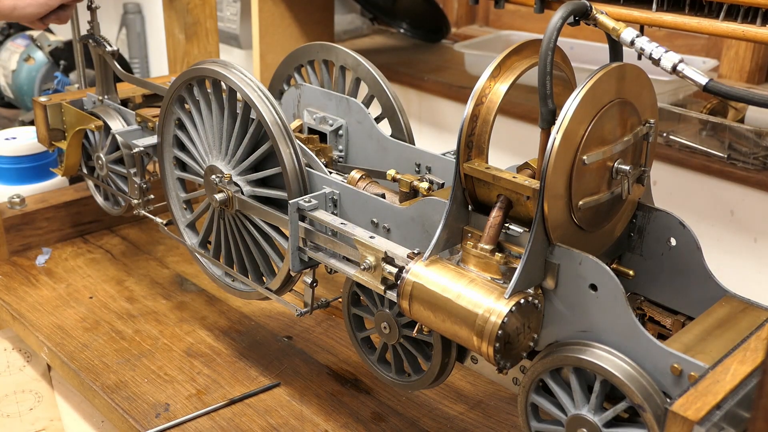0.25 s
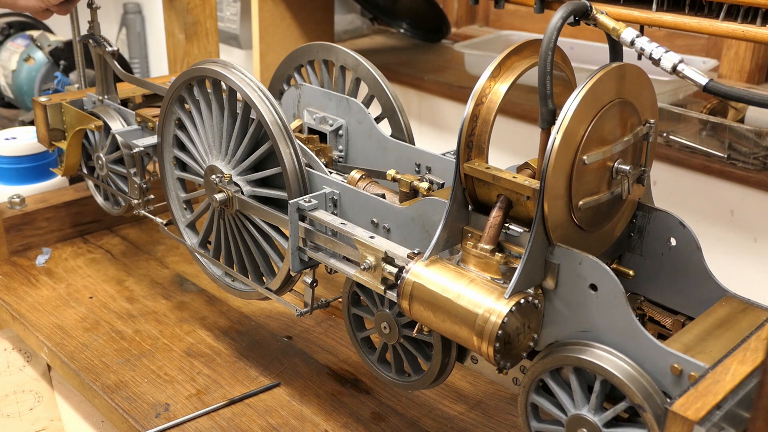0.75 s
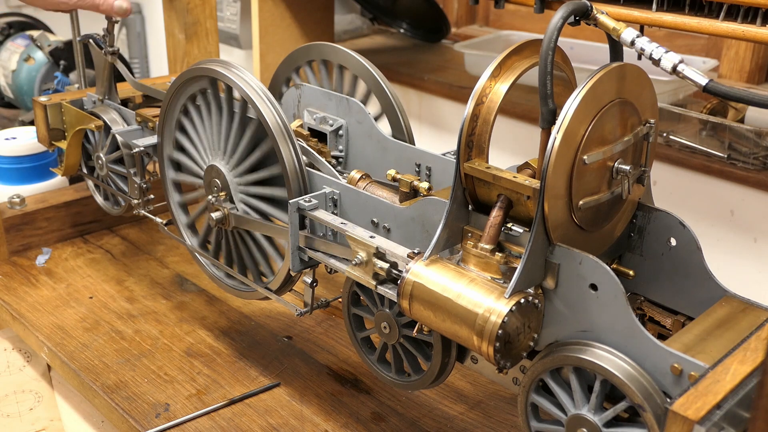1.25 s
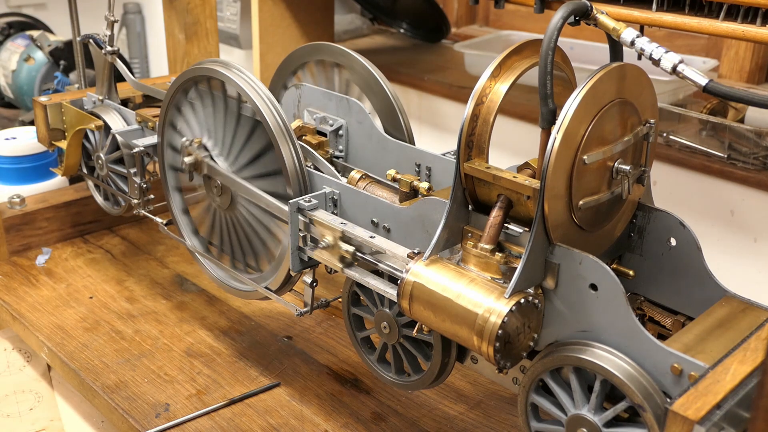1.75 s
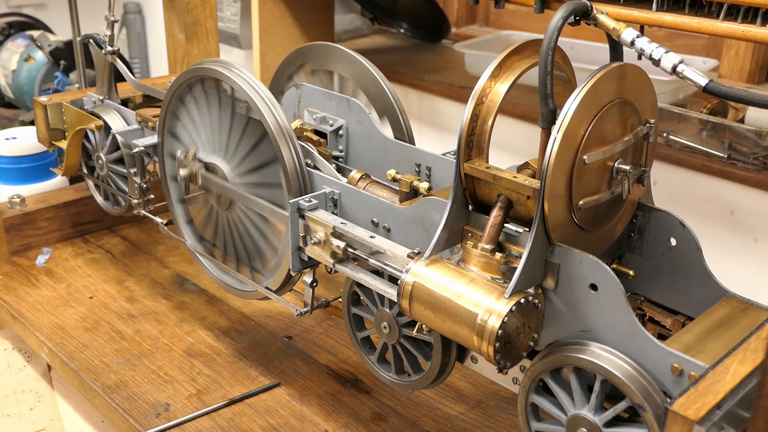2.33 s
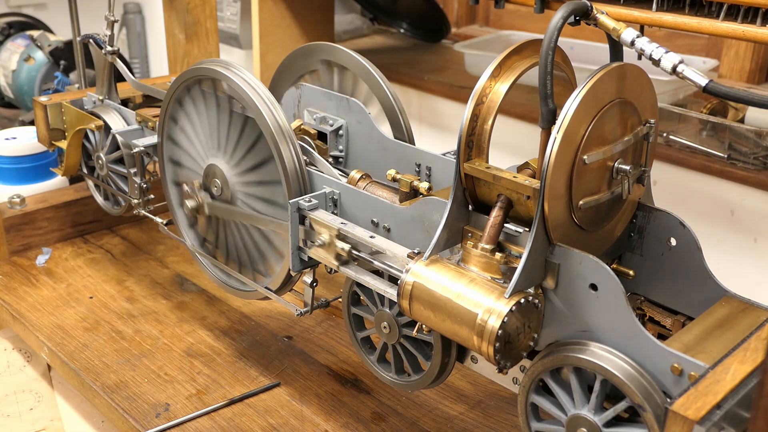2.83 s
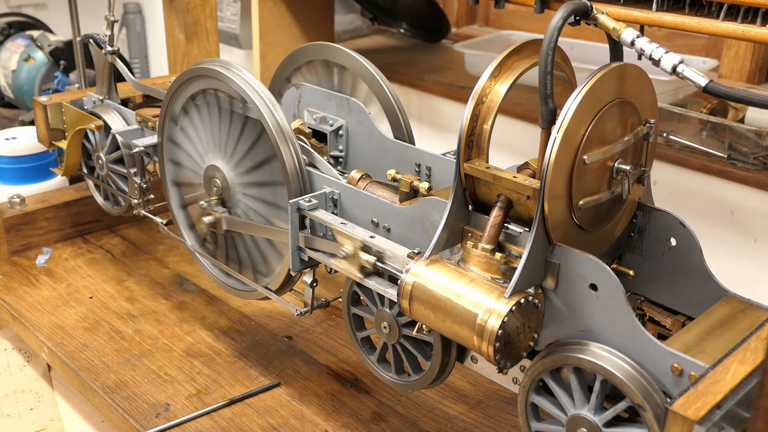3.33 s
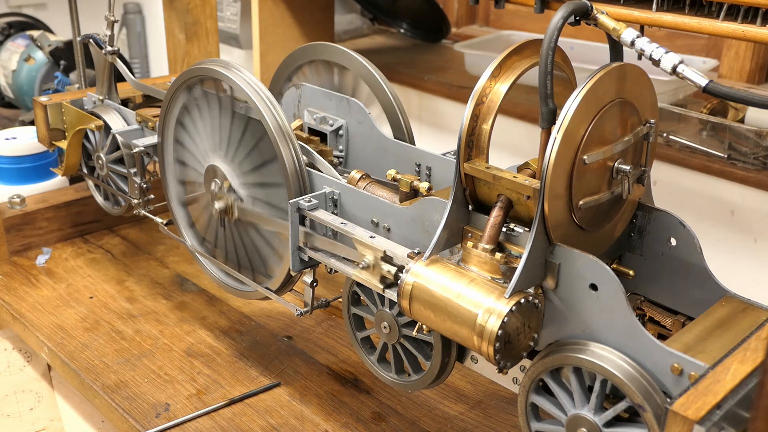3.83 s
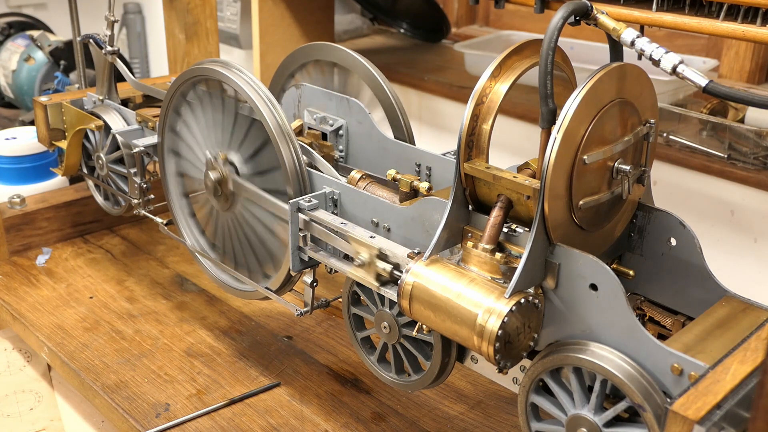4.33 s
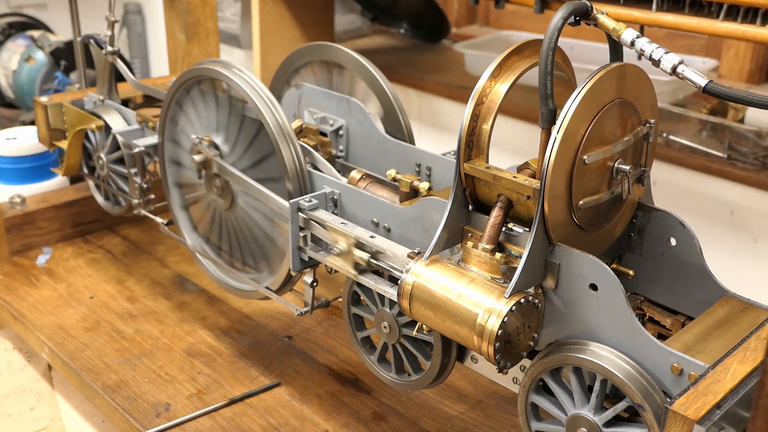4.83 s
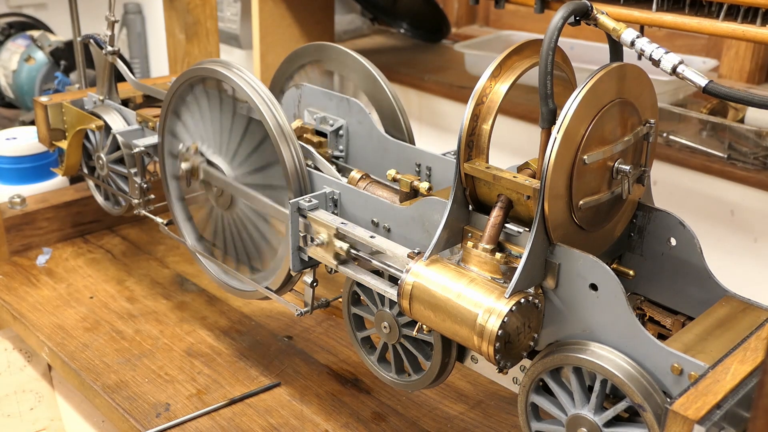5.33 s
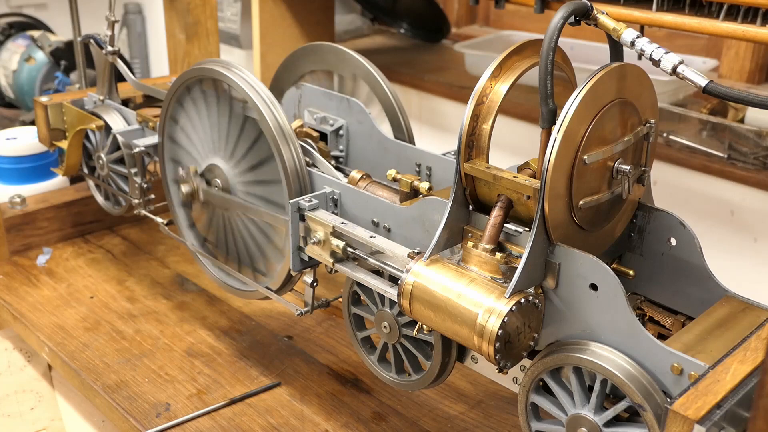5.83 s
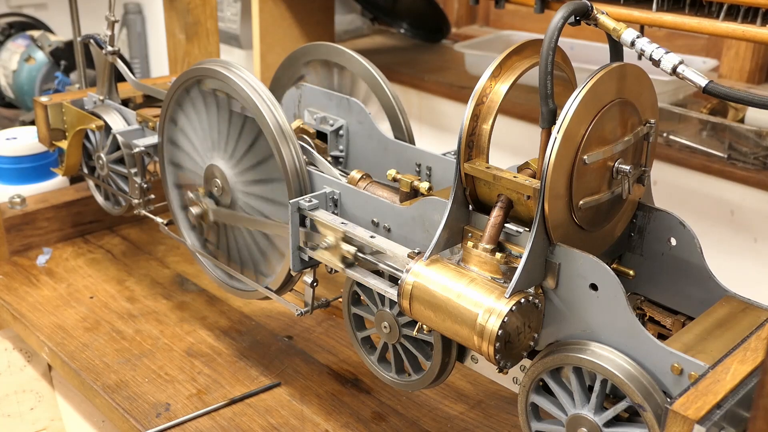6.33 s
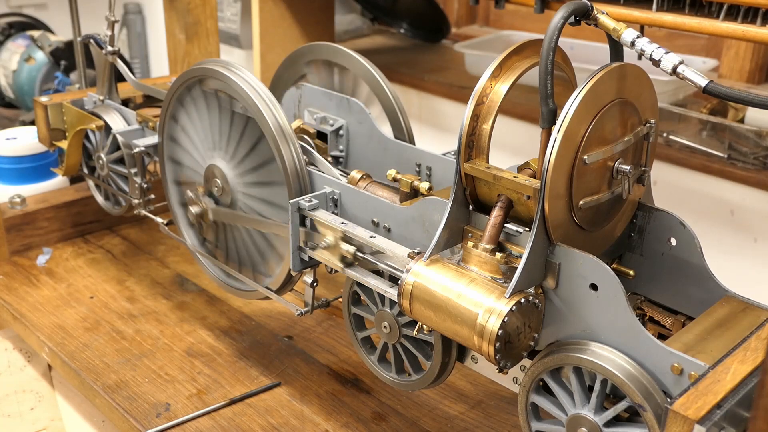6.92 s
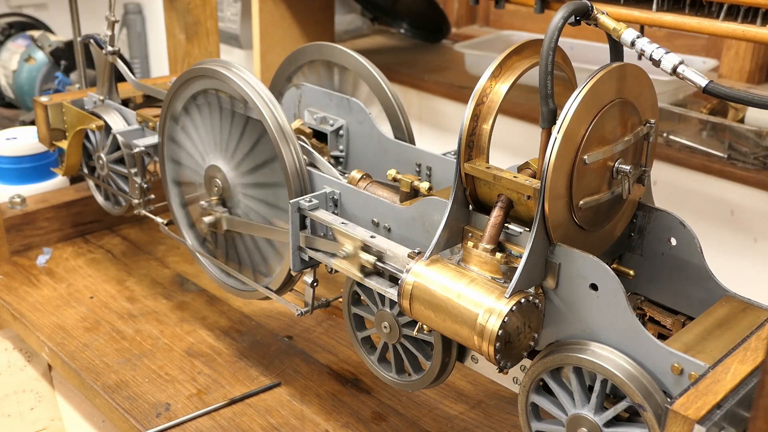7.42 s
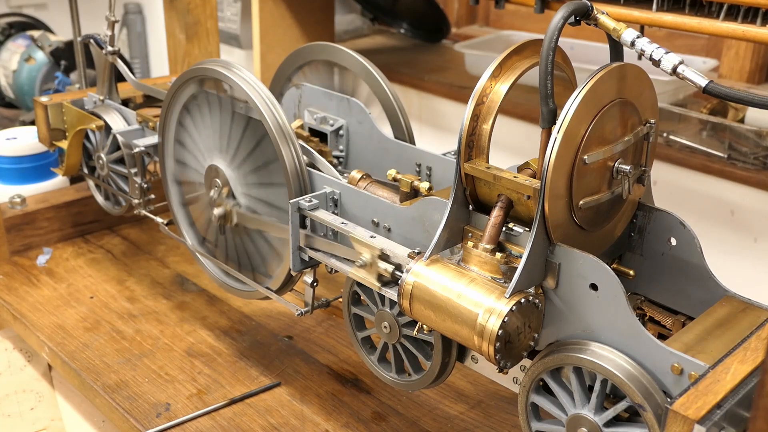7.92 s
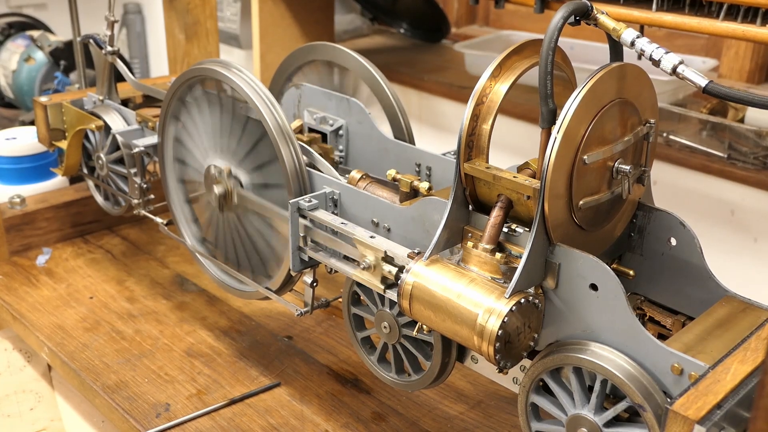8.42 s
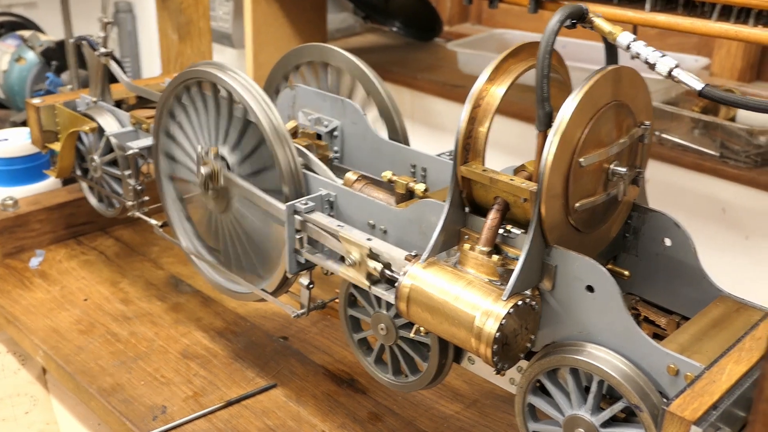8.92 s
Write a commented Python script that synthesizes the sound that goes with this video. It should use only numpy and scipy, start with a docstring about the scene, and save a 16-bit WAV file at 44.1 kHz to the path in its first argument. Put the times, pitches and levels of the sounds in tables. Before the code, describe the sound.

Close stereo in a quiet workshop: a steady, bright air hiss leaks from a hose feeding a model steam locomotive. Knocks and a short scrape open the scene, then sharp metal tap clicks around one and a half seconds. The hiss dips briefly and returns with fast rippling exhaust beats and shifting whistly colours as the wheels spin. Low soft rumble lies beneath, with occasional bench knocks until the end.

```python
"""A model steam locomotive runs on compressed air on a wooden workbench, heard close up by two microphones.
At first the workshop murmurs, air hisses from the hose joint and the standing engine, and the bench is knocked and scraped.
After one second the air tap clicks open and the wheels spin up to just under two turns a second; the hiss dips briefly.
Then the crank angle colours the hiss: four exhaust beats a turn, and each air passage rings loudest at its own angle.
The running gear rumbles and throbs below, rods tick once a turn each, and things go on knocking on the bench."""
import sys
import numpy as np
from scipy import signal
from scipy.io import wavfile

SR = 44100
rng = np.random.default_rng(int(sys.argv[2]) if len(sys.argv) > 2 else 0)


def file_out(sig):
    """Save sig as 16-bit WAV at sys.argv[1]."""
    # one column per channel
    cols = np.atleast_2d(sig).T
    # limit, then scale
    lim = np.clip(cols, -1, 1)
    pcm = np.round(lim * 32767).astype(np.int16)
    wavfile.write(sys.argv[1], SR, pcm)


N = 404397
TIME = np.arange(N) / SR


def from_db(db):
    """Decibels to amplitude gain."""
    return 10 ** (np.asarray(db) / 20)


def rms_one(x):
    """Scale to unit power."""
    return x / np.sqrt(np.mean(x ** 2) + 1e-20)


def in_time(rows):
    """One curve over time per column, joined by straight lines."""
    times_s, *columns = np.transpose(rows)
    return [np.interp(TIME, times_s, column) for column in columns]


def at_hz(points, hz):
    """Read a spectrum on a log-frequency axis."""
    freqs, values = np.transpose(points)
    return np.interp(np.log(hz), np.log(freqs), values)


def drift(rate_hz):
    """Smooth chance that changes about `rate_hz` times a second; spread 1."""
    step = 40   # samples between computed points
    r = np.exp(-2 * np.pi * rate_hz * step / SR)
    chance = rng.standard_normal(N // step + 2002)
    slow = signal.lfilter([1], [1, -2 * r, r * r], chance)[2000:]   # drop the filter's start
    return np.interp(np.arange(N) / step, np.arange(len(slow)), rms_one(slow))


def swell(turns, angle, count):
    """Rises and falls `count` times a turn, with a top at the given crank angle in turns."""
    return np.cos(2 * np.pi * count * (turns - angle))


def band(x, low_hz, high_hz, order=2):
    """Butterworth band-pass."""
    edges = [low_hz, min(high_hz, .45 * SR)]
    return signal.sosfilt(signal.butter(order, edges, "band", fs=SR, output="sos"), x)


def resonate(x, hz, width_hz):
    """Two-pole resonance that keeps the power of white noise."""
    r = np.exp(-np.pi * width_hz / SR)
    feed = np.sqrt((1 - r * r) / 2) * np.array([1, 0, -1])
    return signal.lfilter(feed, [1, -2 * r * np.cos(2 * np.pi * hz / SR), r * r], x)


def stereo(pair, alike):
    """Two unrelated signals become left and right with a given correlation."""
    alike = np.clip(alike, -.99, .99)
    middle = np.sqrt((1 + alike) / 2) * pair[0]
    side = np.sqrt((1 - alike) / 2) * pair[1]
    return middle + side * [[1], [-1]]


def add(out, start_s, sound):
    """Mix a short sound in at its start time."""
    start = max(round(start_s * SR), 0)
    out[:, start:start + sound.shape[-1]] += sound[..., :N - start]


# likeness of broad noise at the left and right microphones: pitch_hz [Hz], correlation [-1 to 1]
MICROPHONE_LIKENESS = [(30, 0.092), (120, 0.018), (250, 0.033), (500, 0.067), (1000, 0.4), (2500, 0.89),
                       (5000, 0.88), (9000, 0.76), (14000, 0.52)]


def turbulence(spectrum, flicker_db, flicker_rate_hz):
    """Third-octave bands of stereo noise, each flickering by itself; rms 1."""
    out, white = 0, rng.standard_normal((2, 2, N))
    lowest_hz, highest_hz = spectrum[0][0], spectrum[-1][0]
    edges = 2 ** np.arange(np.log2(lowest_hz), np.log2(highest_hz) + 1 / 3, 1 / 3)
    for k, (low_hz, high_hz) in enumerate(zip(edges, edges[1:])):
        centre_hz = np.sqrt(low_hz * high_hz)
        gain = from_db(at_hz(spectrum, centre_hz) + flicker_db * drift(flicker_rate_hz))
        noise = band(white[k % 2], low_hz, high_hz)   # neighbouring bands use unrelated noise
        out = out + gain * stereo(noise, at_hz(MICROPHONE_LIKENESS, centre_hz))
    return rms_one(out)


# spectrum of the quiet workshop: pitch_hz [Hz], level_db [dB, relative]
WORKSHOP_SPECTRUM = [(25, -13), (45, -30), (80, -5), (130, -6), (200, -2.5), (380, -1.5), (550, 0.5),
                     (800, -3), (1500, -2), (3000, -25), (8000, -37)]


def workshop():
    """The quiet of the place: faint, slowly flickering broad noise."""
    return from_db(-55.5) * turbulence(WORKSHOP_SPECTRUM, flicker_db=2.0, flicker_rate_hz=2.1)


def hose_pressure(turns, speed, stroke_db, swing_db, angle):
    """The pressure in the hose, in dB, ripples with each stroke, a little more on one of the two."""
    stroke = stroke_db * swell(turns, STROKE_ANGLE, count=2)
    return speed * (stroke + swing_db * swell(turns, angle, count=1))


# spectrum of the jet at the hose joint: pitch_hz [Hz], level_db [dB, relative]
LEAK_SPECTRUM = [(400, -17.5), (1200, -6.5), (2500, -1), (5000, -1.5), (7000, 2.5), (9600, 2), (11500, 0.5),
                 (13000, -5), (14500, -1.5), (16000, -2)]
# surfaces close around the joint: delay_s [s], level_db [dB against the jet]
NEAR_ECHOES = [(.0017, -19), (.0041, -20), (.0073, -8.5), (0.0125, -8.5)]
# resonances of the gap at the joint: pitch_hz [Hz], width_hz [Hz], level_db [dB, relative]
JOINT_MODES = [(7262, 20, -18), (7930, 40, -20), (9440, 80, -21), (10850, 200, -20), (12750, 400, -17),
               (13450, 250, -20)]


def hose_leak(leak_db, speed, squeeze_db):
    """A thin jet rippled by near echoes, brightest while the standing engine holds the pressure back."""
    jet = turbulence(LEAK_SPECTRUM, flicker_db=1.04, flicker_rate_hz=22)
    bright = rms_one(band(stereo(rng.standard_normal((2, N)), 0.71), 10500, 17500))
    jet = jet + from_db(squeeze_db) * np.clip(1 - speed, 0, 1) * bright
    jet = jet + sum(from_db(db) * np.roll(jet, round(delay_s * SR), axis=1) for delay_s, db in NEAR_ECHOES)
    whistles = sum(from_db(db) * resonate(rng.standard_normal((2, N)), hz, width_hz)
                   for hz, width_hz, db in JOINT_MODES)
    flutter_db = 0.1 * drift(40)
    return from_db(leak_db + flutter_db + 0.95) * (jet + stereo(whistles, 1.0))


STROKE_ANGLE = 0.027   # mid-stroke of the first cylinder, in turns; the second follows a quarter turn later


def passage(modes, drive_db, turns, speed, sputter_db, own_db, sputter_rate_hz, alike):
    """Air rings in a passage; the crank opens and closes the way to each mode, and oil makes the jet sputter."""
    out, jet_db = 0, drive_db + sputter_db * drift(sputter_rate_hz)
    stroke = swell(turns, STROKE_ANGLE, count=2)
    for hz, width_hz, level_db, swing_db, angle, stroke_db in modes:
        crank_db = speed * (swing_db * swell(turns, angle, count=1) + stroke_db * stroke)
        gain = from_db(level_db + jet_db + crank_db + own_db * drift(sputter_rate_hz))
        out = out + resonate(rng.standard_normal((2, N)) * gain, hz, width_hz)
    return stereo(out, alike)


# resonances of the exhaust pipe: pitch_hz [Hz], width_hz [Hz], level_db [dB, relative], swing_db [dB over a turn],
# loudest_angle [turns], stroke_db [dB; + swells with the first cylinder, - with the second]
PIPE_MODES = [(2288, 25, -8.5, 3, 0, 0.2), (2357, 16, -15, 1.4, .01, -4), (2451, 30, -11, 2.9, 0.98, 0),
              (2547, 52, -9, 2.8, 0.97, -0.5), (2659, 32, -18, 7.2, 0.84, 2.5),
              (2965, 25, -17, 7.5, 0.05, -2.5), (3268, 78, -10, 1.6, 0.89, 0.1),
              (3375, 31, -10, 2.2, 0.78, 3), (3597, 97, -13, 4.9, .11, 0),
              (3700, 27, -14.5, 2.5, 0.0097, -6), (3773, 15, -13, 1.1, 0.28, 5),
              (3835, 18, -14.5, 1, 0.43, 2.8), (4032, 48, -12, 1.1, 0.83, -1),
              (4170, 23, -12, 3.7, 0.61, -1.6), (4306, 41, -13.5, 1.2, .69, -5),
              (4370, 21, -9.5, 2.2, 0.18, -2.5), (4490, 270, -7.3, 2.6, .52, -1.5),
              (5000, 26, -12, 3.5, 0.48, 2.6)]
# resonances of the narrow valve ports: pitch_hz [Hz], width_hz [Hz], level_db [dB, relative],
# swing_db [dB over a turn], loudest_angle [turns], stroke_db [dB; + first cylinder, - second]
PORT_MODES = [(6120, 32, -7.4, 3.3, 0.52, 4), (6349, 40, -7.5, 3.2, 0.33, -1.5),
              (6510, 36, -7, 5.2, 0.59, -5), (6625, 25, -6.5, 2.8, 0.42, 3), (6770, 160, -6, 3.3, 0.38, 0),
              (6970, 15, -8, 2.3, 0.46, 3), (7030, 75, -5.5, 3.9, 0.48, -1.9),
              (7140, 20, -10, 4.5, 0.61, 0), (7360, 70, -13.5, 6, .57, -2), (7720, 31, -10, 1.9, .43, 4.5),
              (7910, 51, -7.5, 2.8, .51, -4), (8520, 130, -7, 2, 0.56, 1.5), (8710, 55, -8, 1.1, .35, 2.5),
              (8970, 46, -14, 2.4, .61, -2), (9280, 51, -23.5, 1.4, .62, -1)]
# spectrum of the broad exhaust rush: pitch_hz [Hz], level_db [dB, relative]
EXHAUST_SPECTRUM = [(500, -14), (1000, -3.5), (1700, 0), (2050, 6.5), (2500, -1.5), (4000, 4), (4900, -10),
                    (5600, 8), (7000, -5), (8500, -9), (10000, -2), (14000, -15)]
BEATS_PER_TURN = 4   # two double-acting cylinders
BEAT_DB, BEAT_ANGLE = 1, 0.16   # swell of each exhaust beat; angle of the first, in turns
SPUTTER_RATE_HZ = 18


def cylinder(hiss_db, turns, speed, closed_db, rush_db, rush_beat_db, rush_swing_db):
    """Exhaust beats: pipe and ports ring over a broad rush, and ring less while the engine stands."""
    beat = speed * swell(turns, BEAT_ANGLE, count=BEATS_PER_TURN)
    drive_db = hiss_db + BEAT_DB * beat + closed_db * (1 - speed)
    pipe = passage(PIPE_MODES, drive_db, turns, speed, sputter_db=0.68, own_db=1.27,
                   sputter_rate_hz=SPUTTER_RATE_HZ, alike=0.91)
    ports = passage(PORT_MODES, drive_db, turns, speed, sputter_db=0.5, own_db=1.2,
                    sputter_rate_hz=SPUTTER_RATE_HZ, alike=0.94)
    rings = from_db(0.69) * band(pipe, 2300, 4810, order=4)
    rings = rings + from_db(-1.93) * band(ports, 4960, 12000, order=3)
    turn_db = rush_swing_db * speed * swell(turns, 0, count=1)
    rush = from_db(hiss_db + rush_db + rush_beat_db * beat + turn_db)
    return rings + rush * turbulence(EXHAUST_SPECTRUM, flicker_db=1.0, flicker_rate_hz=6.3)


# modes of the bench and the engine frame: pitch_hz [Hz], level_db [dB, relative], t60_s [s]
BENCH_MODES = [(103, 7, 0.13), (150, -3.5, 0.057), (214, -3.5, 0.13), (266, 0.5, 0.19), (433, -4.5, 0.1),
               (531, -6.5, 0.12), (543, -3, 0.062), (646, 2, 0.068), (695, -2.5, 0.096), (860, -34, 0.031),
               (1130, -10, .06), (1470, -11, .05)]


def knocks(blows, spread_octaves, rattle_octaves):
    """A knock rings the bench modes near its own colour, and loose parts rattle after it."""
    out, t = np.zeros((2, N)), TIME[:SR // 2]
    mode_hz, mode_db, mode_t60_s = np.transpose(BENCH_MODES)[:, :, None]
    modes = from_db(-60 * t / mode_t60_s) * np.sin(2 * np.pi * mode_hz * t)
    for start_s, level_db, centre_hz, t60_s, rattle_db in blows:
        weight = np.exp(-.5 * (np.log2(mode_hz / centre_hz) / spread_octaves) ** 2)
        uneven_db = mode_db + rng.normal(0, 1.0, mode_db.shape)
        strength = weight * from_db(uneven_db) * rng.choice([-1, 1], mode_db.shape)
        noise = stereo(rng.standard_normal((2, len(t))), 0.85)
        rattle = rms_one(band(noise, centre_hz / 2, centre_hz * 2 ** rattle_octaves, order=1))
        knock = np.sum(strength * modes, axis=0) + rattle * from_db(rattle_db - 60 * t / t60_s)
        knock = band(knock, centre_hz * 0.52, 5300)   # small parts radiate little bass
        add(out, start_s, from_db(level_db) * knock)
    return out


def gesture(start_s, length_s, level_db, attack_s, release_s):
    """Attack, hold and release; attack and release each span 60 dB."""
    before = np.maximum(start_s - TIME, 0) / attack_s
    after = np.maximum(TIME - start_s - length_s, 0) / release_s
    return from_db(level_db - 60 * (before + after))


# faint hollow rubbing on the bench after two of the knocks: start_s [s], length_s [s], level_db [dB]
HOLLOW_RUBS = [(.38, 0.087, -57), (6.4, .22, -56)]
SCRAPE_S, SCRAPE_LENGTH_S, SCRAPE_DB = 0.153, 0.026, -42   # a short slide among the opening knocks


def scrape():
    """Uneven slips under a sliding contact: a bright scrape and a hollow rub."""
    slips = stereo(rng.standard_normal((2, N)), 0.94) * from_db(2.4 * drift(200))
    bright = gesture(SCRAPE_S, SCRAPE_LENGTH_S, SCRAPE_DB, attack_s=0.065, release_s=.19)
    hollow = sum(gesture(*rub, attack_s=.2, release_s=.45) for rub in HOLLOW_RUBS)
    bright = bright * rms_one(band(slips, 1500, 5200, order=3))
    return bright + hollow * rms_one(band(slips, 510, 660))


ROOM_T60_S = 0.37


def room(x):
    """A short diffuse tail starts 4 ms after each sound, different at each microphone."""
    t = TIME[:SR // 2]
    noise = band(rng.standard_normal((2, len(t))), 90, 2200, order=1)
    tail = noise * from_db(-60 * t / ROOM_T60_S) * (t > .004)
    return signal.fftconvolve(x, tail / np.sqrt(np.sum(tail ** 2) / 2), axes=1)[:, :N]


# spectrum of the running gear: pitch_hz [Hz], level_db [dB, relative]
GEAR_SPECTRUM = [(60, -13), (100, -4.5), (170, -10), (250, -6), (330, 0), (420, -1.5), (700, 0.5),
                 (1200, -12), (2500, -12)]
FRAME_HZ = 248


def running_gear(turns, speed, rumble_db, drone_db, drone_width_hz, throb_db, beat_db, push_angle):
    """Axles rumble with speed; a frame mode throbs with each piston push, both pushes of a turn alike, and
    swells again with the exhaust beats."""
    rumble = from_db(rumble_db) * turbulence(GEAR_SPECTRUM, flicker_db=3.5, flicker_rate_hz=12)
    push_db = throb_db * swell(turns, push_angle, count=2)
    push_db = push_db + beat_db * swell(turns, push_angle, count=BEATS_PER_TURN)
    frame = stereo(resonate(rng.standard_normal((2, N)), FRAME_HZ, drone_width_hz), 0.078)
    return speed * (rumble + from_db(drone_db + push_db) * frame)


# sharp clicks of the air tap: start_s [s], level_db [dB], lowest_hz [Hz], highest_hz [Hz],
# t60_s [s], ringing_db [dB against the click]
TAP_CLICKS = [(1.0593, -29, 1870, 8500, 0.079, -10.5), (1.4224, -26, 2500, 7060, 0.051, -11),
              (1.4416, -24.5, 1390, 13800, 0.022, -7)]
# ringing of the tap: pitch_hz [Hz], level_db [dB, relative], t60_s [s, before ring_scale]
TAP_MODES = [(1002, -10, 0.1), (1106, 0.5, 0.051), (1160, -18, 0.39), (1323, -14, 0.37),
             (1586, -0.5, 0.073), (2000, -1.5, 0.079), (2190, -2, 0.14), (2540, -5, 0.11), (2573, -9, .2),
             (3325, -3, 0.1), (4320, -5, 0.074), (5110, -5, 0.14), (5150, -8, 0.13)]


def tap_clicks(crack_db, clatter_db, clatter_t60_s, ring_scale):
    """Each click is a crack and a quickly dying scatter; the tap rings and clatters on."""
    out, t = np.zeros((2, N)), TIME[:SR // 2]
    for start_s, level_db, low_hz, high_hz, t60_s, ring_db in TAP_CLICKS:
        noise = stereo(rng.standard_normal((2, len(t))), 0.91)
        scatter = rms_one(band(noise, low_hz, high_hz, order=1))
        fade = from_db(-60 * t / t60_s) + from_db(crack_db - 60 * t / 0.0044)
        ring = 0
        for hz, mode_db, mode_t60_s in TAP_MODES:
            decay = from_db(mode_db - 60 * t / (mode_t60_s * ring_scale))
            ring = ring + decay * np.sin(2 * np.pi * hz * t) * rng.choice([-1, 1])
        clatter = rms_one(band(stereo(rng.standard_normal((2, len(t))), 1.0), 900, 3100))
        clatter = clatter * from_db(clatter_db - 60 * t / clatter_t60_s)
        add(out, start_s, from_db(level_db) * (scatter * fade + from_db(ring_db) * (ring + clatter)))
    return band(out, 800, 17000, order=3)


# play in the rods, taken up once every turn: angle [turns], level_db [dB, relative], centre_hz [Hz],
# rattle_t60_s [s], rattle_db [dB, relative]
ROD_PLAY = [(.29, -58, 534, 0.056, -14), (.83, -56, 736, 0.11, 6)]


def rod_ticks(turns, scatter_db):
    """From the second turn on, the rods tick at the same crank angles, unequally hard; rows as for knocks."""
    ticks = []
    for turn in range(1, int(turns[-1])):
        for angle, level_db, *colour in ROD_PLAY:
            start_s = np.interp(turn + angle, turns, TIME)
            ticks.append((start_s, level_db + scatter_db * rng.standard_normal(), *colour))
    return ticks


# hiss level over time, dipping briefly after the click at 1.44 s and soon recovering:
# start_s [s], exhaust_db [dB, relative], leak_db [dB, relative]
HISS_LEVEL = [(0, -45.5, -43.5), (.9, -46, -44), (1.1, -45, -45), (1.38, -44.5, -45), (1.49, -50, -47.5),
              (1.65, -47.5, -46.5), (1.85, -45.5, -46), (2.2, -45, -45), (9.17, -45, -45)]
# wheel speed: start_s [s], wheel_speed [turns per s]
WHEEL_SPEED = [(0, 0), (1, 0), (1.5, .9), (2, 1.505), (2.6, 1.645), (4, 1.688), (6, 1.731), (9.17, 1.765)]
# knocks on the bench and the frame: start_s [s], level_db [dB, relative], centre_hz [Hz],
# rattle_t60_s [s], rattle_db [dB, relative]
BENCH_KNOCKS = [(0.091, -45.5, 880, 0.061, 2.5), (0.159, -31, 454, 0.13, -5.5), (0.176, -36, 720, 0.28, -5),
                (0.199, -37.5, 720, .1, -12), (1.061, -47, 277, 0.26, -4), (2.069, -47, 644, 0.34, 0),
                (2.666, -40.5, 560, 0.27, -2.5), (2.683, -48, 263, 0.079, -8),
                (5.477, -40.5, 302, 0.14, 1.5), (5.5, -41, 180, 0.16, -4.5), (5.53, -41, 199, 0.07, -8),
                (5.94, -54.5, 143, 0.34, -2), (6.385, -58, 500, 0.09, 9), (6.437, -39, 490, 0.21, -2.5),
                (6.468, -63, 560, 0.41, -4), (7.232, -48, 600, 0.18, 0), (7.716, -31.5, 770, 0.11, -8),
                (7.738, -45, 680, .1, 6), (7.774, -41.5, 400, 0.17, 2), (8.455, -51.5, 207, .1, -7),
                (8.955, -46, 168, 0.2, -1)]
REST_ANGLE = .402   # where the crank stands before the start, in turns


def scene():
    """Hiss, running gear and contacts in the quiet of the workshop."""
    exhaust_db, leak_db = in_time(HISS_LEVEL)
    turns_per_s, = in_time(WHEEL_SPEED)
    turns = REST_ANGLE + np.cumsum(turns_per_s) / SR
    speed = turns_per_s / turns_per_s.max()   # 0 standing, 1 at its fastest
    floor = workshop()
    ripple_db = hose_pressure(turns, speed, stroke_db=0.5, swing_db=0.4, angle=0.46)
    leak = hose_leak(leak_db + ripple_db, speed, squeeze_db=-6.5)
    exhaust = cylinder(exhaust_db, turns, speed, closed_db=-5.0, rush_db=-5.5, rush_beat_db=0.3, rush_swing_db=1.9)
    air = exhaust * from_db([[-.4], [.4]]) + leak   # the exhaust is slightly louder on the right
    blows = BENCH_KNOCKS + rod_ticks(turns, scatter_db=1.0)
    contacts = from_db(1) * knocks(blows, spread_octaves=0.4, rattle_octaves=0.86) + scrape()
    contacts = contacts + tap_clicks(crack_db=-18, clatter_db=-7.5, clatter_t60_s=0.47, ring_scale=0.85)
    gear = running_gear(turns, speed, rumble_db=-58.0, drone_db=-63.5, drone_width_hz=14.4,
                        throb_db=2.5, beat_db=2.5, push_angle=0.13)
    return air + gear + floor + contacts + from_db(-11.0) * room(contacts)


CUTOFF_HZ = 15600


def record(dry):
    """The top is cut steeply."""
    return signal.sosfilt(signal.ellip(12, .1, 80, CUTOFF_HZ, fs=SR, output="sos"), dry)


dry = scene()
out = record(dry)
file_out(out)
```